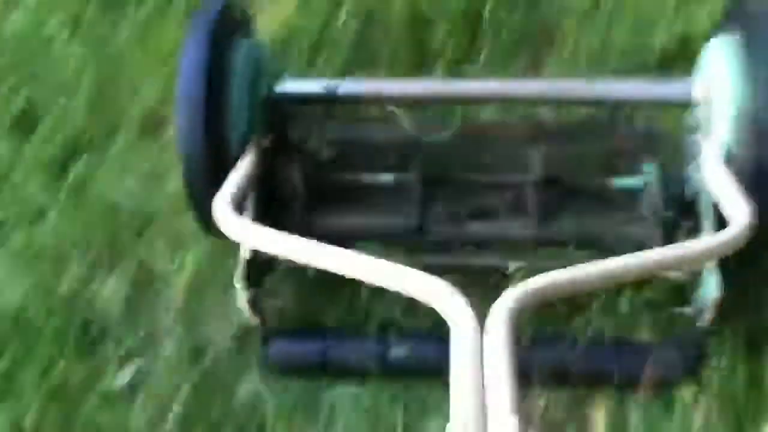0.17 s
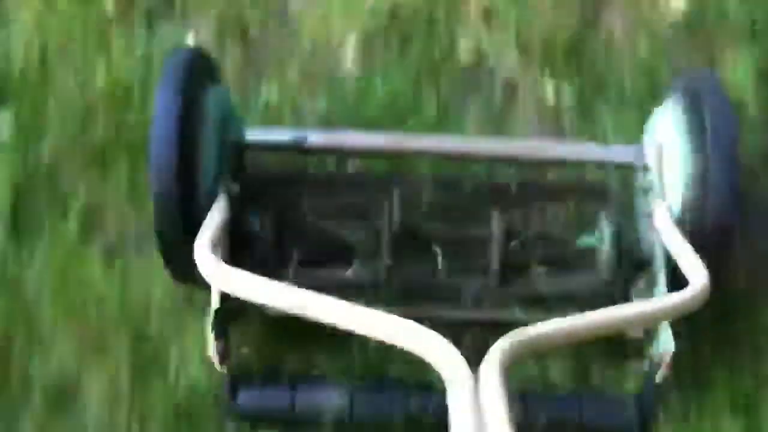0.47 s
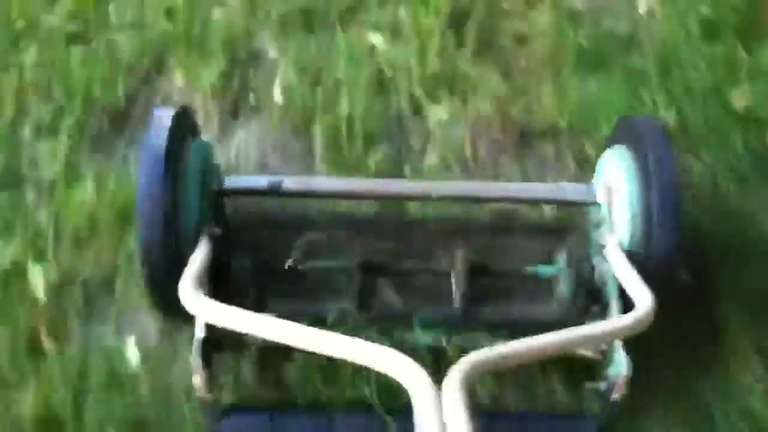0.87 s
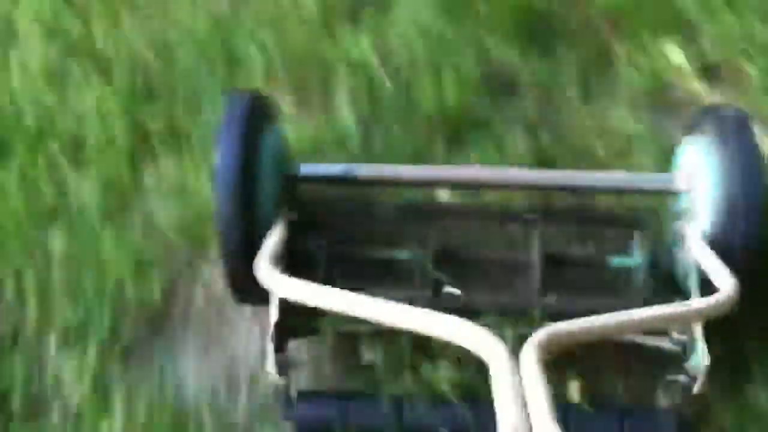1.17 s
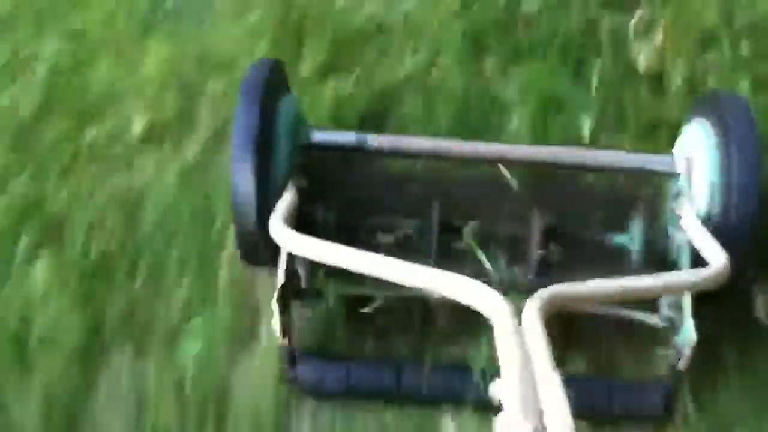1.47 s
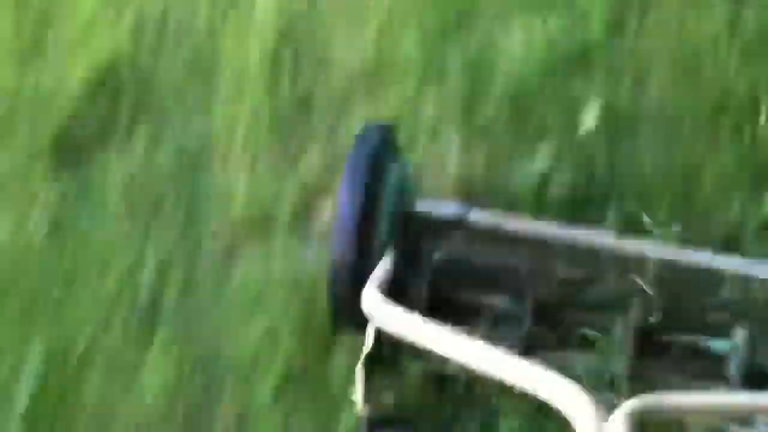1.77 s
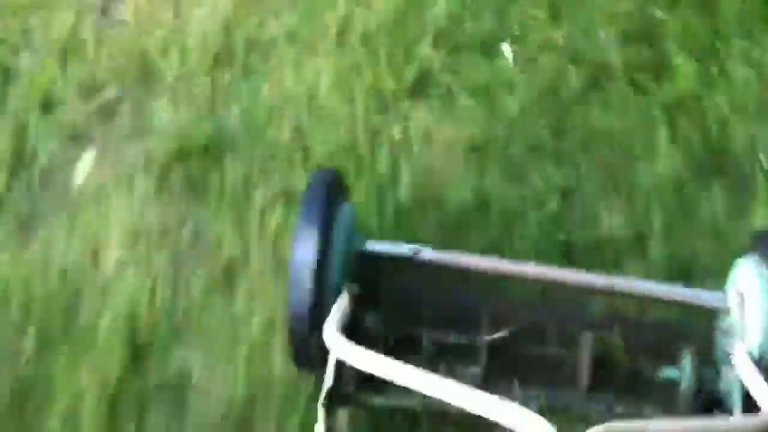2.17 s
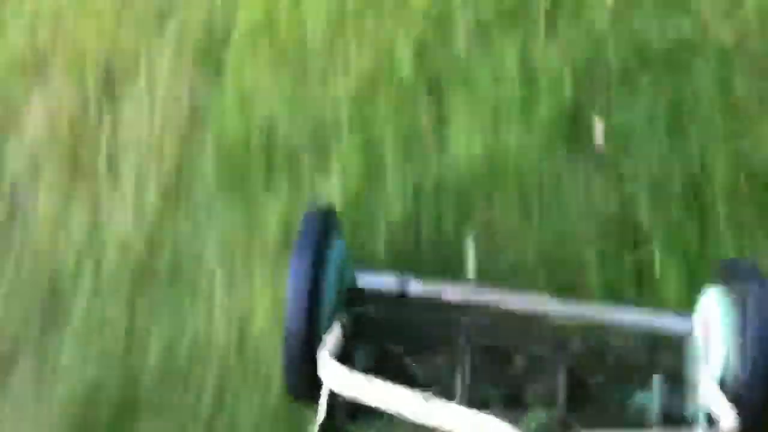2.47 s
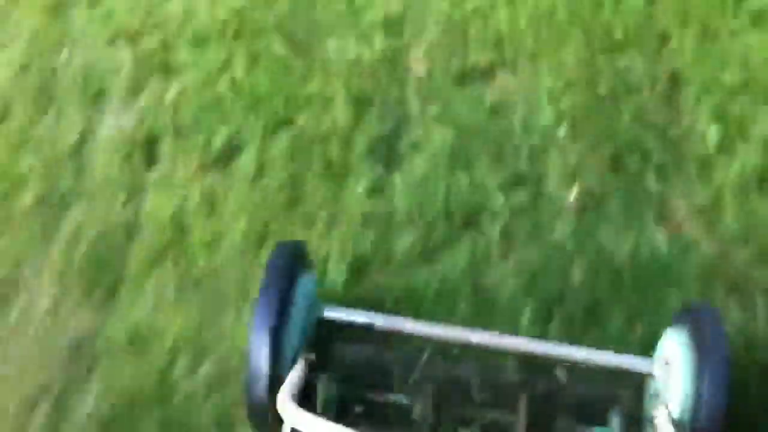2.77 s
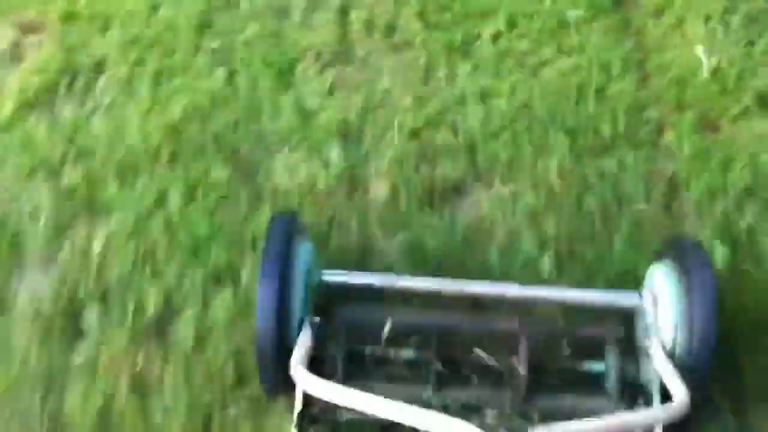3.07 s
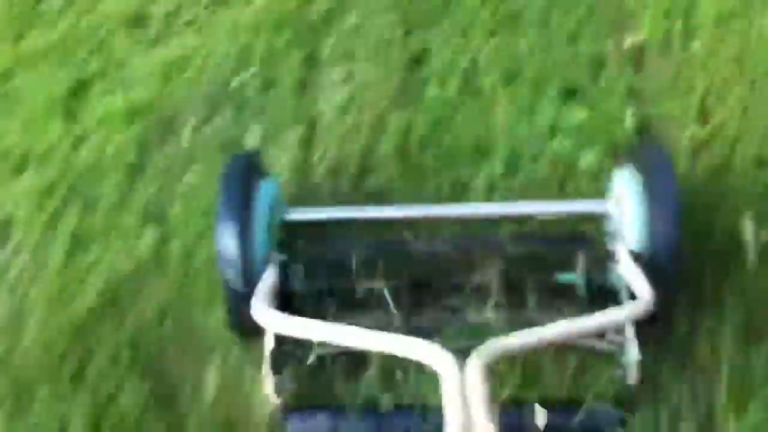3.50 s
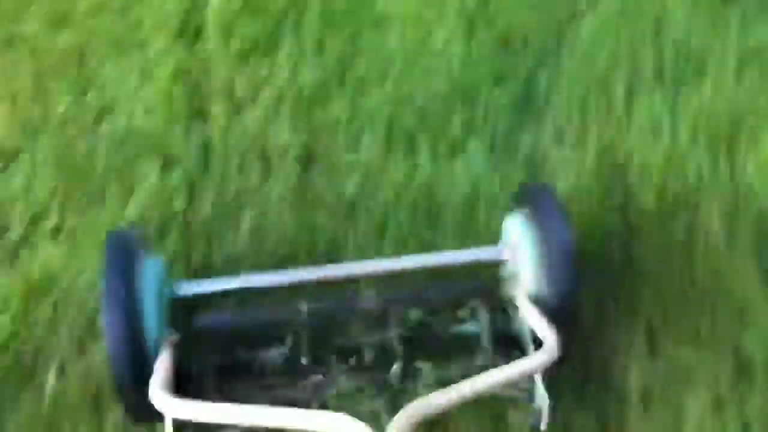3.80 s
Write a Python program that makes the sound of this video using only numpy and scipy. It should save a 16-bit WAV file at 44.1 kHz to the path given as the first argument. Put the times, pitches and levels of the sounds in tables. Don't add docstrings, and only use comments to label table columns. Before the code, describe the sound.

Close to the handle on an open lawn, a reel mower whirs with a metallic rattle and hum, snipping grass; clanks cluster near the middle, the hardest just before three seconds, over faint wheel rumble.

```python
import sys
import numpy as np
from scipy import signal
from scipy.fft import rfft, irfft
from scipy.io import wavfile

SR = 44100
rng = np.random.default_rng(int(sys.argv[2]) if len(sys.argv) > 2 else 0)


def log_audio(samples):
    frames = np.atleast_2d(samples).T
    limited = np.clip(frames, -1, 1)
    pcm = np.round(limited * 32767).astype(np.int16)
    wavfile.write(sys.argv[1], SR, pcm)


def boost_factor(decibels):
    exponent = np.asarray(decibels, float) / 20
    return 10 ** exponent


N = 173754

# t/s, scraping level/dB, tightness of blades on knife/dB
PUSH = [(0.0, -40.5, 6.5), (0.5, -40, -16), (0.86, -40.5, 0), (1.15, -37.5, -3), (1.39, -38, 0),
        (1.6, -33, -1), (1.95, -33.5, 0), (2.2, -34.5, 4.5), (2.7, -32, 3.5), (3.25, -32.5, 5),
        (3.5, -30.5, 3.5), (3.94, -32.5, 3)]
# start t/s, length/s, gain level/dB,
# extra snipping level/dB
SURGES = [(0, 0.017, 8.5, -2), (0.06, 0.13, 4.5, 4), (0.27, 0.011, 5.5, 1.5), (0.301, 0.058, 6.5, -0.5),
          (0.368, 0.074, 6, 1.5), (0.568, 0.08, 4.5, 1.5), (0.61, 0.035, 1.5, -0.5),
          (0.734, 0.056, 3.5, 1.5), (0.797, 0.051, 5, 0), (0.91, 0.012, -2, 1), (0.932, 0.029, -3, -1),
          (0.977, 0.082, 4, 3), (1.006, 0.071, 2.5, 1.5), (1.103, 0.016, 1.5, -5), (1.219, 0.038, 4.5, 0.5),
          (1.332, 0.015, 3.5, -1.5), (1.364, 0.0086, 6, 0.5), (1.408, 0.056, 5, 2.5),
          (1.498, 0.014, 1.5, 3), (1.549, 0.031, 2.5, 2.5), (1.594, 0.036, 3, 5), (1.626, 0.028, 0.5, -4.5),
          (1.742, 0.027, -1.5, 4), (1.857, 0.022, -4.5, 3), (1.9, 0.077, 2, 3), (1.97, 0.075, 1, -0.5),
          (2.112, 0.067, 4.5, 2.5), (2.207, 0.019, -2.5, -3), (2.268, 0.071, 3.5, -0.5),
          (2.349, 0.021, 2.5, -1.5), (2.376, 0.013, -3.5, -6), (2.44, 0.095, 1, 1), (2.476, 0.064, 2, 5),
          (2.664, 0.022, 3, -2), (2.765, 0.038, 0.5, 3), (2.864, .1, 2, 4), (2.977, 0.014, -5, 1),
          (3.042, 0.041, 1, 3), (3.138, .01, 0, 0), (3.165, 0.026, 3, 3), (3.235, 0.077, 3, 5.5),
          (3.42, 0.05, 0, 2.5), (3.505, .012, -4, 1), (3.55, 0.066, 1, 1), (3.638, 0.052, 0, 0),
          (3.694, 0.016, -3, 0), (3.868, 0.043, -1, 8), (3.933, .02, 0.5, 2)]
SURGE_RISE_S, SURGE_FALL_S = 0.0042, 0.01
# f/Hz, level/dB
SCRAPE_COLOUR = [(260, -45), (450, -20.5), (730, -12), (866, -8.5), (997, -0.5), (1270, -8), (1720, -4.5),
                 (3550, -13.5), (4500, -17.5), (6500, -36.5), (11000, -120)]
# f/Hz, level/dB
SNIP_COLOUR = [(2060, -3), (3500, -29), (4600, 1), (5580, 5), (6870, 0), (15200, 2), (16200, -30),
               (16500, -49)]
# f/Hz, width/Hz, level/dB
FRAME_MODES = [(731.5, 18, 12.5), (952, 35, -9), (1016, 21.4, 9), (1479, 45, 10), (1678, 39, 6),
               (2070, 22, 1), (2210, 47, 8), (2310, 75, -9), (2736, 230, 7.5)]
# f/Hz, width/Hz, level over the scraping/dB
GEAR_HUM = [(732, 23, -15), (1016.7, 27, -10.5)]
SCRAPES_PER_S, SCRAPE_SPREAD_DB, SCRAPE_FLICKER_DB = 2800, 1.5, 0.88
SNIPS_PER_S, SNIP_SPREAD_DB, SNIP_DB = 5000, 1, -9.5
SNIP_FOLLOWS, HUM_FOLLOWS = 0.85, 0.75
FRAME_DB, SING_DB = -6.5, -9
SING_DAMPING = 0.36
PATCH_DB, PATCH_PER_S = 2, 16.5
# t/s, peak level/dB
STALKS = [(0.074, -29), (0.1481, -27), (0.3626, -39), (0.3855, -28), (0.5945, -30), (0.6205, -31),
          (0.7322, -46), (0.9068, -35), (0.9747, -28), (1.0001, -36), (1.223, -43), (1.4691, -35),
          (1.5444, -34), (1.6013, -5), (1.703, -6), (1.7754, -11), (1.8133, -19), (1.8731, -18),
          (1.897, -20), (1.979, -17), (2.0762, -18), (2.165, -52), (2.2573, -36), (2.3052, -26),
          (2.3531, -40), (2.3989, -30), (2.5047, -14), (2.602, -25), (2.6698, -30), (2.753, -25),
          (2.7816, -25), (2.8285, -8), (3.0081, -22), (3.0754, -26), (3.1692, -26), (3.1936, -18),
          (3.2331, -23), (3.2635, -13), (3.3538, -27), (3.4251, -21), (3.584, -25), (3.6296, -24),
          (3.6656, -19), (3.8696, -19)]
STALKS_DB, STALK_S = -8.5, 0.0046

# f/Hz, level/dB
WHEEL_COLOUR = [(15, -60), (25, -30), (54, -47), (91, -11.5), (197, -7), (264, -9), (448, -8), (635, -12),
                (700, -9.5), (910, -5.5), (1540, -120)]
WHEELS_DB, HISS_DB = -51.5, -46
AXLE_HZ, AXLE_WIDTH_HZ, AXLE_DB = 204, 16, -60

# t/s, peak level/dB
KNOCKS = [(0.071, -22), (0.106, -20), (0.135, -26), (0.18, -26), (0.307, -29), (0.318, -30), (0.366, -39),
          (0.416, -21), (0.531, -24), (0.571, -22), (0.614, -17), (0.727, -22), (0.752, -19.5),
          (0.902, -22.5), (0.974, -26), (1.0, -40), (1.014, -17), (1.037, -11), (1.226, -20),
          (1.337, -17.5), (1.372, -24), (1.4, -30), (1.443, -33), (1.501, -22), (1.551, -24), (1.605, -22),
          (1.662, -29), (1.7, -14), (1.773, -8), (1.813, -32), (1.866, -25), (1.9, -17), (1.931, -26.5),
          (2.006, -29), (2.075, -36), (2.112, -22), (2.155, -32), (2.301, -30), (2.344, -18), (2.418, -26),
          (2.459, -16), (2.478, -15), (2.502, -10), (2.652, -14), (2.708, -18), (2.838, -10), (2.923, -25),
          (3.003, -26), (3.149, -19), (3.17, -15), (3.235, -15), (3.261, -18), (3.348, -26), (3.417, -31),
          (3.455, -26), (3.498, -24), (3.526, -30), (3.566, -29), (3.707, -21), (3.75, -24)]
KNOCKS_DB, KNOCK_RUN_S = -8, 0.0074
# t/s, chatter length/s, blade ring level/dB, knife ring level/dB, frame knock level/dB
CLANKS = [(1.701, 0.03, -19, -42, -18), (1.775, 0.022, -31, -42, -12.5), (3.871, 0.02, -37, -46, -28),
          (1.812, 0.024, -30, -39, -23.5), (2.076, 0.022, -32, -33, -25.5), (2.504, 0.028, -42, -22, -19),
          (2.828, .005, -36, -17, -23), (2.837, 0.055, -22.5, -21, -15), (3.189, 0.02, -34, -40, -29),
          (3.422, .01, -41, -49, -32), (2.253, 0.036, -41, -47, -28), (2.303, 0.0048, -40, -40, -25)]
CHATTER_PER_S, CHATTER_FADE_DB, BLOW_RISE_S = 4400, 11.5, 0.00097
CRUNCH_DB, CRACK_S, KNOCK_S = 3, 0.011, 0.0024
# f/Hz, level/dB, time to fade by 60 dB/s
BLADE_MODES = [(5340, -8, 0.07), (5400, -3, .1), (5478, -3.5, 0.2), (5520, -3, .1), (5705, -3, 0.1),
               (5860, 0, 0.08), (5940, -6, 0.1), (6015, -9, 0.06), (8150, -4, 0.045), (8295, -3, .05),
               (9235, 0, 0.055), (11800, -1, 0.03), (13590, -5, .04), (15500, -7, .04)]
# f/Hz, level/dB, time to fade by 60 dB/s
KNIFE_MODES = [(7210, -10, 0.08), (8345, -9, 0.04), (10875, 1, 0.09), (11350, -14, .03), (11900, -11, .03),
               (15100, -11, .03), (15370, -8, .04), (15560, -11, .06)]
# t/s, contact length/s, level/dB
JARS = [
    (1.704, 0.03, -35),
    (1.815, .03, -30),
    (2.506, .03, -31),
    (2.83, .015, -31),
    (2.857, 0.04, -24),
    (3.19, 0.04, -30),
]
# f/Hz, level/dB, time to fade by 60 dB/s
BAR_MODES = [(2040, -10, 0.1), (3712, -0.5, 0.08), (3755, -3, 0.08)]
# t/s, contact length/s, level/dB
BRACKET_BLOWS = [
    (2.84, .034, -19),
    (3.19, .02, -34),
    (3.875, .02, -37),
]
# f/Hz, level/dB, time to fade by 60 dB/s
BRACKET_MODES = [(9325, -8, .06), (9650, -13, .06), (10483, 0, .07), (10592, -4, .07), (6520, -16, .06)]
THUMP_HZ, THUMP_WIDTH_HZ, THUMP_DB = 220, 250, 9


def noise():
    return rng.standard_normal(N)


def rms_one(x):
    return x / np.sqrt(np.mean(x ** 2) + 1e-20)


def colour(x, points):
    hz, db = np.transpose(points)
    f = np.arange(N // 2 + 1) * SR / N + 1
    octaves_outside = np.log2(np.maximum(hz[0] / f, 1)) + np.log2(np.maximum(f / hz[-1], 1))
    gain_db = np.interp(np.log(f), np.log(hz), db) - 40 * octaves_outside
    return irfft(rfft(x) * boost_factor(gain_db), N)


def drift(rate_hz):
    r = np.exp(-2 * np.pi * rate_hz / SR)
    settled = signal.lfilter([1], [1, -2 * r, r * r], rng.standard_normal(N + SR))[SR:]
    return rms_one(settled)


def ring(x, hz, t60):
    r = boost_factor(-60 / (t60 * SR))
    w = 2 * np.pi * hz / SR
    return signal.lfilter([0, np.sin(w)], [1, -2 * r * np.cos(w), r * r], x + 1e-18)


def resonance(x, hz, width_hz):
    r = np.exp(-np.pi * width_hz / SR)
    top = np.array([1, 0, -1]) * (1 - r * r) / 2
    return signal.lfilter(top, [1, -2 * r * np.cos(2 * np.pi * hz / SR), r * r], x)


def grains(per_s, spread_db):
    sizes = boost_factor(spread_db * np.minimum(rng.exponential(1, N), 4.0))
    signs = rng.choice([-1, 1], N)
    return rms_one(sizes * signs * (rng.random(N) < per_s / SR))


def burst(s, length):
    out = np.zeros(N)
    length = np.clip(length, .002, .08)
    start = max(int(s * SR), 0)
    t = np.arange(min(int(1.5 * length * SR), N - start)) / SR
    shape = np.minimum(t / BLOW_RISE_S, 1) * boost_factor(-CHATTER_FADE_DB * t / length)
    out[start:start + len(t)] = shape / np.sqrt(length * SR / 4)
    return out


def load():
    t, gain_db, snip_db = np.arange(N) / SR, np.zeros(N), np.zeros(N)
    for s, length, db, extra_db in SURGES:
        end = s + length
        shape = np.interp(t, [s - SURGE_RISE_S, s, end, end + SURGE_FALL_S], [0, 1, 1, 0])
        gain_db = gain_db + db * shape
        snip_db = snip_db + extra_db * shape
    return gain_db, snip_db


def frame(x):
    broad = colour(x, SCRAPE_COLOUR)
    narrow = sum(boost_factor(db) * resonance(broad, hz, width) for hz, width, db in FRAME_MODES)
    return broad + boost_factor(FRAME_DB) * narrow


def scraping(level_db, flicker_db):
    scrape = grains(SCRAPES_PER_S, SCRAPE_SPREAD_DB) * boost_factor(level_db + flicker_db)
    return frame(scrape) / np.std(frame(noise()))


def singing(level_db, tight_db, flicker_db):
    rub = boost_factor(level_db + tight_db + SING_DB + 0.66 * flicker_db) * noise()
    return sum(boost_factor(db) * ring(rub, hz, t60 * SING_DAMPING) for hz, db, t60 in BLADE_MODES[:8]) / 40


def stalk_snaps():
    snaps = sum(boost_factor(min(db, -26) + STALKS_DB) * burst(s - .001, STALK_S) for s, db in STALKS)
    return snaps * np.sqrt(STALK_S * SR / 4)


def snipping(level_db, snip_db):
    snips = rms_one(colour(grains(SNIPS_PER_S, SNIP_SPREAD_DB), SNIP_COLOUR))
    mean_db = level_db.mean()
    swell_db = SNIP_FOLLOWS * (level_db - mean_db) + snip_db
    flutter_db = 2.0 * drift(66) + 0.2 * drift(34)
    return snips * (boost_factor(mean_db + SNIP_DB + swell_db + flutter_db) + stalk_snaps())


def gear_hum(level_db):
    hum = sum(boost_factor(db) * rms_one(resonance(noise(), hz, width)) for hz, width, db in GEAR_HUM)
    mean_db = level_db.mean()
    return hum * boost_factor(mean_db + HUM_FOLLOWS * (level_db - mean_db))


def patchy(x):
    spectrum, out = rfft(x), 0
    f = np.arange(len(spectrum)) * SR / N
    place = 2 * np.log2(np.clip(f, 1000, 16000) / 1000)
    for k in range(9):
        band = irfft(spectrum * np.maximum(1 - abs(place - k), 0), N)
        out = out + band * boost_factor(PATCH_DB * drift(PATCH_PER_S))
    return out


def reel():
    push_s, push_db, push_tight_db = np.transpose(PUSH)
    t = np.arange(N) / SR
    gain_db, snip_db = load()
    level_db = np.interp(t, push_s, push_db) + gain_db
    tight_db = np.interp(t, push_s, push_tight_db)
    flicker_db = SCRAPE_FLICKER_DB * (drift(34) + 0.32 * drift(6.3))
    cutting = patchy(scraping(level_db, flicker_db) + snipping(level_db, snip_db))
    return cutting + singing(level_db, tight_db, flicker_db) + gear_hum(level_db)


def wheels():
    roll = rms_one(colour(noise(), WHEEL_COLOUR)) * boost_factor(WHEELS_DB + 1.0 * drift(5.4))
    hum = rms_one(resonance(noise(), AXLE_HZ, AXLE_WIDTH_HZ)) * boost_factor(AXLE_DB + 3.7 * drift(2.1))
    return roll + hum


def open_air():
    air_colour = [(3000, -26), (9500, -0.5), (11500, 13), (14000, 0.5), (16500, 4)]
    return boost_factor(HISS_DB) * rms_one(colour(noise(), air_colour))


def strikes(events, column):
    return sum(boost_factor(row[column]) * burst(row[0], row[1]) for row in events)


def frame_thud(blow, touches):
    gears = sum(boost_factor(min(db, -17) + KNOCKS_DB) * burst(s - .002, KNOCK_RUN_S) for s, db in KNOCKS)
    struck = (blow + gears) * touches
    body = sum(ring(struck, hz, 0.74 / width) for hz, width, db in FRAME_MODES[2:])
    return boost_factor(-11.0) * body + boost_factor(9.0) * ring(struck, 2660, KNOCK_S)


def ringing_steel(blade, knife, touches):
    parts = [(blade, BLADE_MODES), (knife, KNIFE_MODES),
             (strikes(JARS, 2), BAR_MODES), (strikes(BRACKET_BLOWS, 2), BRACKET_MODES)]
    out = np.zeros(N)
    for drive, modes in parts:
        for k, (hz, db, t60) in enumerate(modes):
            own_touches = np.roll(touches, 97 * k)
            out += boost_factor(db) * ring(drive * own_touches, hz, t60)
    return out


def crunch(blade, knife):
    crack = sum(boost_factor(max(row[2:4])) * burst(row[0], CRACK_S) for row in CLANKS)
    crack = crack + (blade + knife) / 10
    return boost_factor(CRUNCH_DB) * 10 * crack * noise()


def clanks():
    blade, knife, blow = (strikes(CLANKS, column) for column in (2, 3, 4))
    touches = grains(CHATTER_PER_S, 2.05)
    bright = frame_thud(blow, touches) + ringing_steel(blade, knife, touches) + crunch(blade, knife)
    thump = boost_factor(THUMP_DB) * resonance(blow * touches, THUMP_HZ, THUMP_WIDTH_HZ)
    no_lows = signal.butter(3, 800, "high", fs=SR, output="sos")
    return signal.sosfilt(no_lows, bright) + thump


def scene():
    return (reel() + wheels() + open_air() + clanks())[None]


def low_pass(x):
    return signal.sosfilt(signal.butter(12, 17180, fs=SR, output="sos"), x)


def record(dry):
    sharp_top = signal.ellip(10, .5, 55, 15780, fs=SR, output="sos")
    mix = signal.sosfilt(sharp_top, dry)
    return low_pass(mix)


dry = scene()
out = record(dry)
log_audio(out)
```